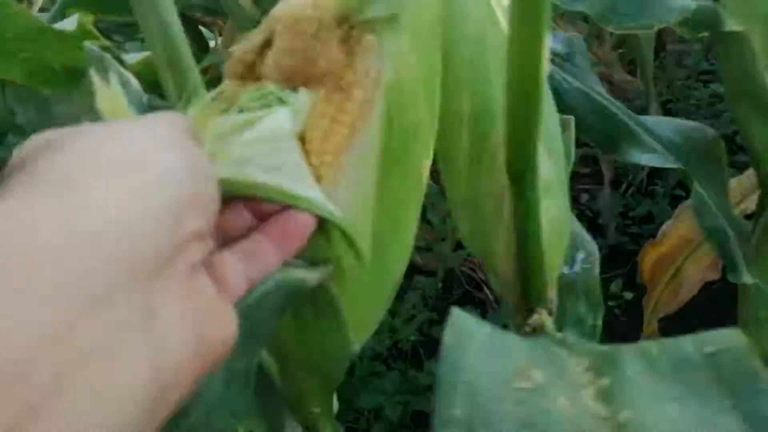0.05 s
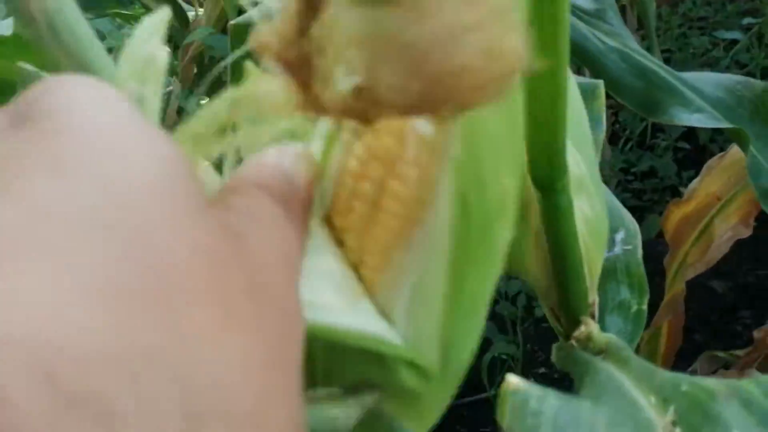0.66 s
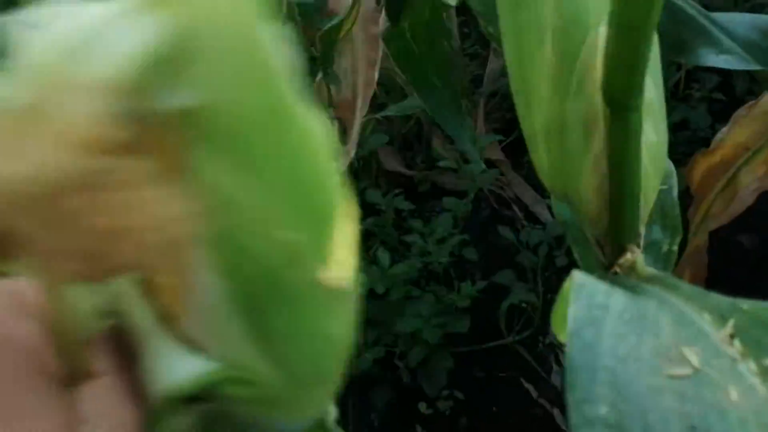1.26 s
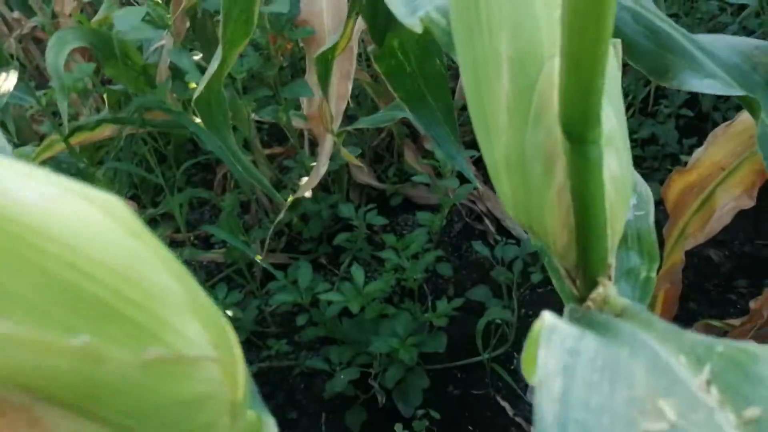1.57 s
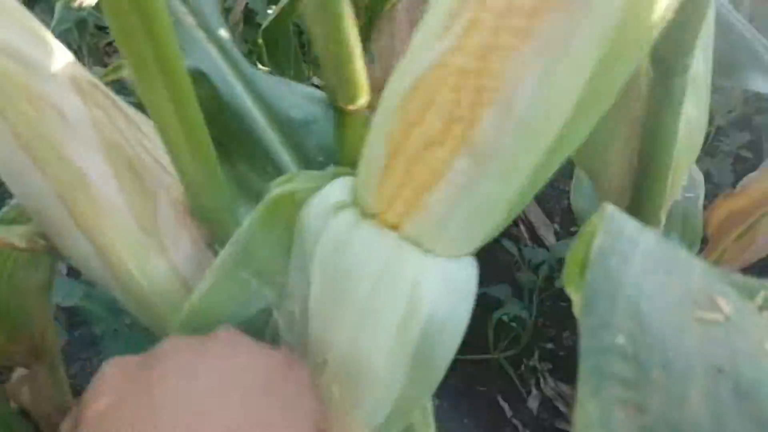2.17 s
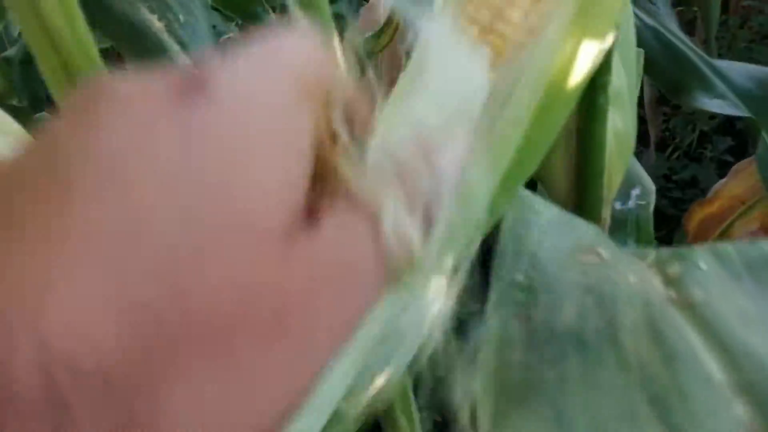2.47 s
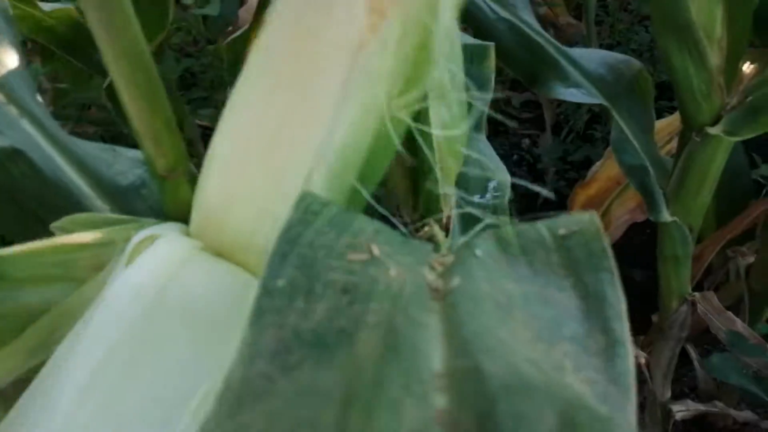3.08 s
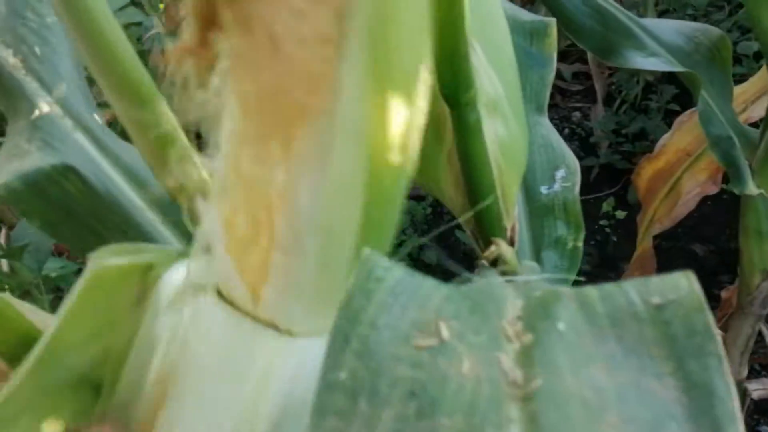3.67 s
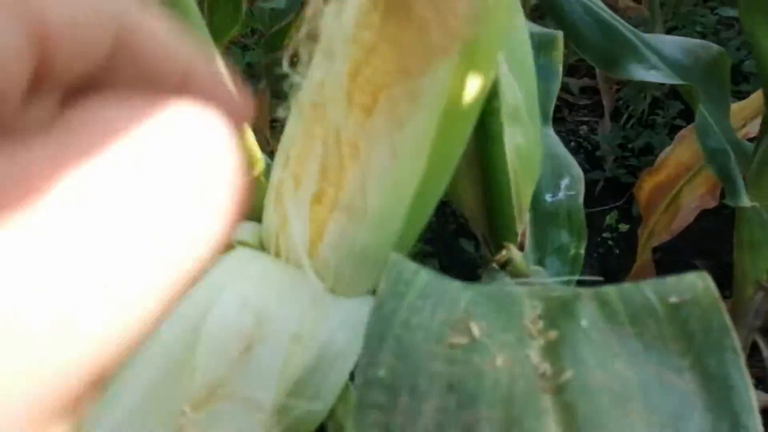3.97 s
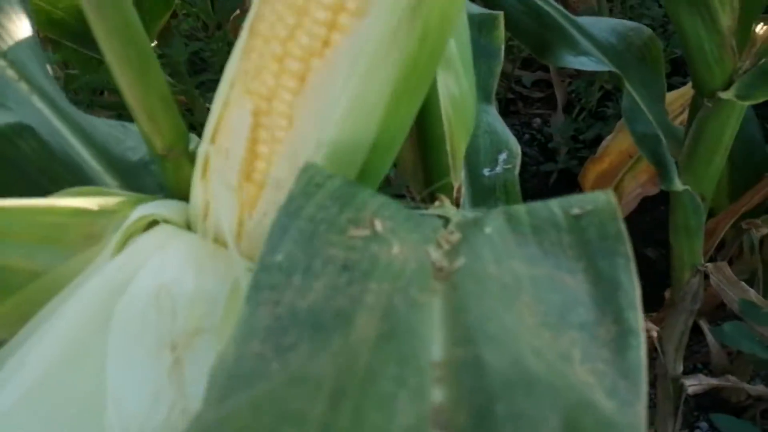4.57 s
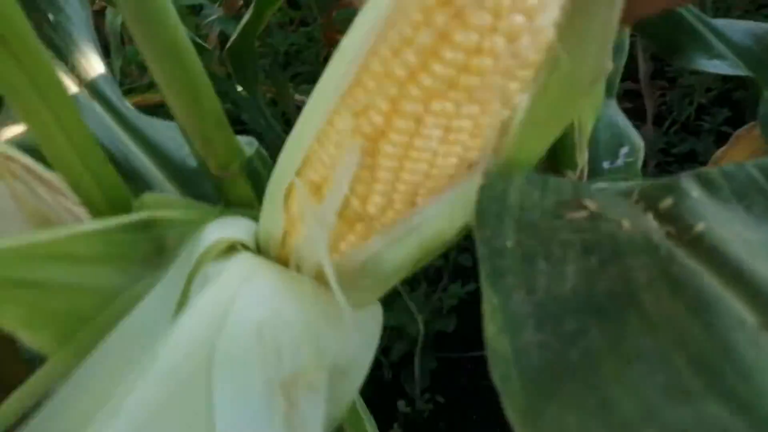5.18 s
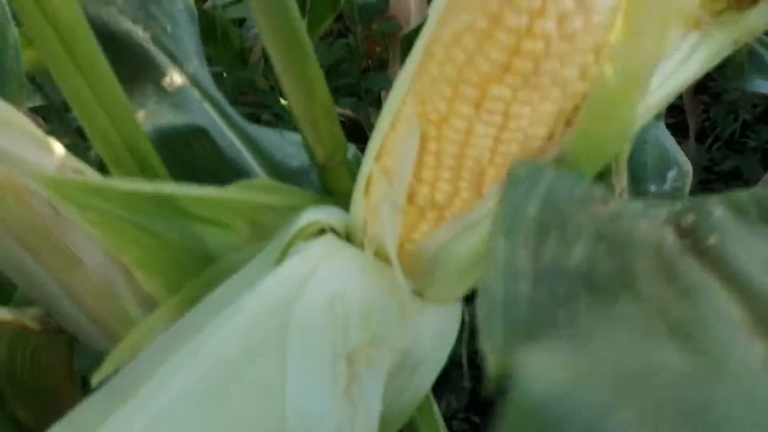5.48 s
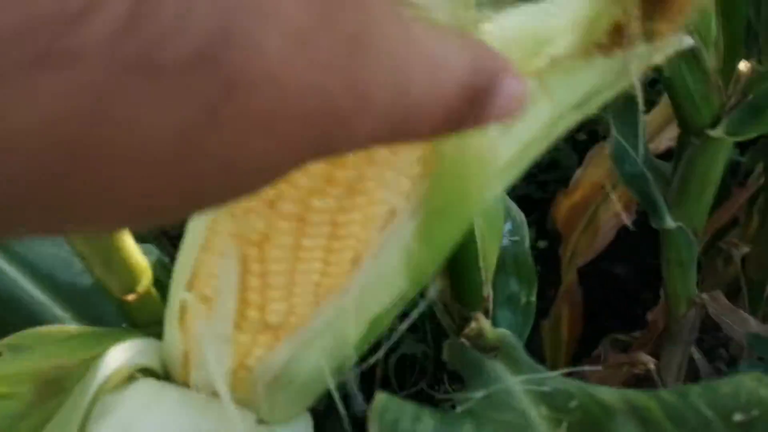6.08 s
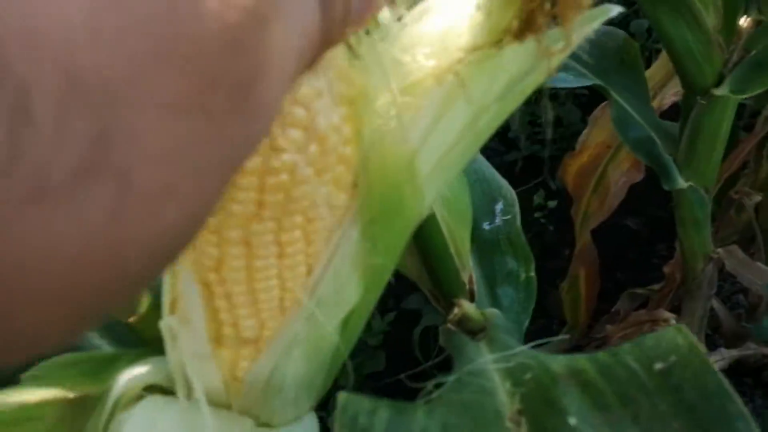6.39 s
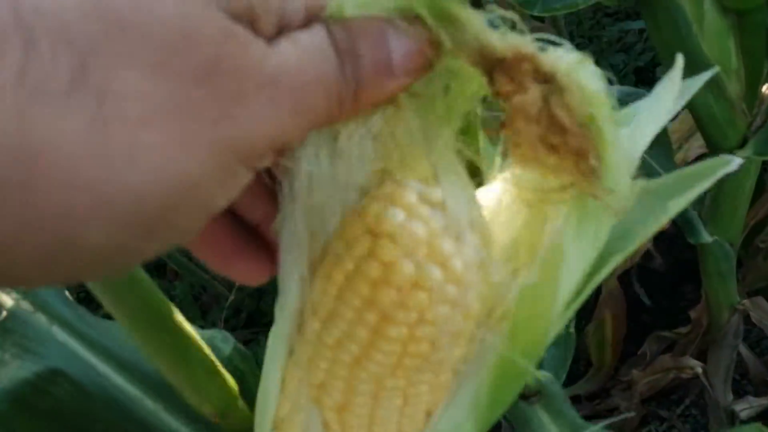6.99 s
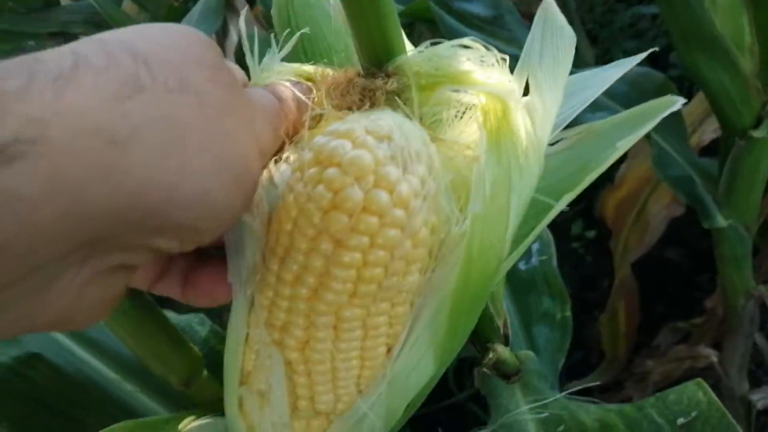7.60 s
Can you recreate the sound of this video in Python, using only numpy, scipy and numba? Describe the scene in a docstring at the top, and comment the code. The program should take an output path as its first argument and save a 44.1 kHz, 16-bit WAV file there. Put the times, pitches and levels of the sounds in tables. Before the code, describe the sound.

Close rustling, ripping and cracking of husk leaves pulled off an ear of corn, with a few dull knocks and a faint outdoor rumble.

```python
"""In a field, a hand peels the husk from an ear of corn, close to a two-port microphone.
It goes in short tugs: fibres tear in dense tiny snaps that ring the strip, and the leaves rub, slide
and squeak as they stick and slip. Strips rip free, ribs crack, silk draws out with a hiss and the cob
knocks against the stalk. Underneath are the hand's dull friction, a low hum like a far idling engine,
a faint flutter of air and one puff of wind."""
import sys
import numpy as np
from scipy import signal
from scipy.fft import rfft, irfft, next_fast_len
from scipy.io import wavfile
from scipy.ndimage import uniform_filter1d
from numba import njit

SR = 44100
rng = np.random.default_rng(int(sys.argv[2]) if len(sys.argv) > 2 else 0)


def dump(signal):
    """Clip the signal to [-1, 1] and save it as 16-bit WAV at the path in sys.argv[1]."""
    limited = np.clip(np.atleast_2d(signal).T, -1, 1)
    pcm = np.round(limited * 32767).astype(np.int16)
    wavfile.write(sys.argv[1], SR, pcm)


N = 346185
TIME = np.arange(N) / SR
PORT_LAG_S = .00041


# Tugs on the husk. Each row: start in seconds, length in seconds, tearing, rubbing and sliding
# levels in relative dB, swell from start to end in dB, ring of the strip in Hz.
TUGS = [(0.0, 0.037, -61, -47.5, -51.5, -5, 1910), (0.186, 0.11, -54.5, -48, -56.5, 0, 1920),
        (0.392, 0.18, -57.5, -55.5, -62, -6.5, 1850), (0.666, 0.14, -56, -56, -60.5, -3, 1750),
        (0.829, 0.2, -55, -55, -55.5, -5.5, 1910), (1.128, 0.075, -69, -60.5, -66, 4, 1970),
        (1.288, 0.1, -68, -54, -59, -6, 1500), (1.525, 0.095, -50, -49, -51, -5, 2050),
        (1.746, 0.17, -52, -63, -54.5, 0, 1870), (1.897, 0.1, -52.5, -52, -51, -2, 1680),
        (2.001, 0.08, -58, -55, -49, 0, 2100), (2.111, 0.32, -59, -55.5, -60, -7, 2020),
        (2.633, 0.12, -59, -65, -61, -1, 1980), (2.757, 0.23, -57, -51, -58, -1, 1900),
        (3.004, 0.23, -62, -54.5, -61, 0, 1900), (3.275, 0.12, -61, -58.5, -61.5, 1, 2100),
        (3.651, 0.21, -62, -57, -58, 1.5, 1890), (3.87, .1, -54, -51.5, -68, -5, 1730),
        (4.05, .2, -51.5, -54.5, -61.5, 1, 1830), (4.265, 0.17, -50.5, -52, -53, 0, 1950),
        (4.443, 0.21, -50.5, -56.5, -60.5, -2, 2090), (4.788, 0.12, -55, -54.5, -57, 5, 2180),
        (4.893, 0.039, -45.5, -58, -60, -2, 2240), (5.101, .03, -72, -70, -53.5, -3, 2300),
        (5.361, 0.13, -67, -56.5, -57.5, -1, 2200), (5.48, 0.057, -50, -63, -59.5, -4, 2160),
        (5.605, 0.017, -51, -68, -55.5, -2, 2090), (5.76, 0.09, -66, -72, -61.5, 2, 2020),
        (5.947, 0.045, -50, -54.5, -64.5, -2, 1820), (6.145, 0.14, -54, -52.5, -66.5, -7, 1780),
        (6.331, 0.14, -59.5, -56.5, -74, -5, 1770), (6.62, 0.12, -52, -60.5, -79, 1.5, 1910),
        (6.83, .18, -61.5, -64, -67, 0, 1880), (7.134, .17, -67, -63.5, -67.5, 0, 1930),
        (7.566, 0.093, -73, -63, -69, -5, 1980), (7.763, 0.071, -61.5, -70, -65, -3, 1900)]
# Leaves shifting in the hand between tugs. Each row: time in seconds, relative level in dB.
HANDLING = [(0, -57.5), (.55, -56), (.62, -63.5), (.75, -58), (1.25, -59.5), (1.7, -54.5), (2.45, -58),
            (3.5, -59.5), (3.85, -58.5), (4.04, -63), (4.7, -57), (5.04, -61), (5.3, -58), (5.85, -60.5),
            (6.08, -64.5), (7.1, -64.5), (7.4, -69), (7.85, -62.5)]

def pull(attack_s=.025, release_s=.035, handling_mix_db=(-5, .5, -2)):
    """Tearing, rubbing and sliding in dB: over the handling, each tug takes hold, then dies away."""
    power = from_db(in_time(HANDLING)[0] + np.array(handling_mix_db)[:, None]) ** 2
    for s, length, *levels_db, swell_db, _ in TUGS:
        age = TIME - s
        attack = np.clip(age / attack_s + .5, 0, 1)
        hold = from_db(swell_db * (np.clip(age / length, 0, 1) - .5))
        release = np.exp(-np.clip(age - length, 0, 1) / release_s)
        power += (from_db(levels_db)[:, None] * attack * hold * release) ** 2
    return 10 * np.log10(power)


def tearing(fibres, level_db, rise_hz_per_s=680):
    """Snapping fibres ring the strip; each strip has its own pitch, which climbs as it tightens."""
    glide = [(s + share * length, hz + rise_hz_per_s * length * (share - .5))
             for s, length, *_, hz in TUGS for share in (0, 1)]
    strip_hz = in_time(glide)[0] * np.exp(.048 * drift(35))
    strip = resonate(port_noise(alike=.47) * fibres, strip_hz, width_hz=604)
    return from_db(level_db) * at_ports(strip, [(900, 10.5), (1500, 3.5), (2400, -3), (4000, 15.5)])


# The papery rasp of leaf on leaf. Each row: frequency in Hz, gain in dB.
RUB_EQ = [(500, -26), (1500, -22), (2100, -4), (2700, -1), (5500, -1.5), (7500, -11.5), (10000, -20),
          (16000, -7)]

def rubbing(fibres, level_db):
    """Leaf drags on leaf; the contact patch wanders, and its two rings with it."""
    friction = port_noise(alike=.15) * fibres
    patch = resonate(port_noise(alike=.2) * fibres, 2850 * np.exp(.18 * drift(40)), width_hz=410)
    edge = resonate(friction, 5200 * np.exp(.14 * drift(30)), width_hz=770) * from_db(3.5 * drift(22))
    rings = from_db(-3) * at_ports(patch, RUB_EQ) + from_db(-12) * at_ports(edge, RUB_EQ)
    return from_db(level_db + 1.5) * rms_one(at_ports(friction, RUB_EQ) + rings)


# The bright hiss of parting leaves. Each row: frequency in Hz, gain in dB.
SLIDE_EQ = [(500, -28), (1500, -9), (3000, -8.5), (5000, -2.5), (8000, -2), (16000, 0.5)]
# Where the leaves slide. Each row: time in seconds, pan position (-10 is centre, higher is left).
SLIDE_PAN = [(0, -10.5), (.8, -11.5), (1.0, -21), (1.35, -13.5), (3.3, -12.5), (4.95, -14), (5.2, -9),
             (5.8, -11.5), (7.85, -11)]

def sliding(fibres, hairs, level_db):
    """Coarse and fine hairs catch in turn, so the hiss keeps changing its brightness."""
    coarse = port_noise(alike=.087) * hairs * fibres ** .5
    coarse = at_ports(coarse, SLIDE_EQ, [(9500, -2), (12000, -3)])
    fine = at_ports(port_noise(alike=.1) * hairs, [(6000, -36), (10000, -5), (12000, 3.5)])
    fine *= from_db(4.1 * drift(25) - 13.5)
    return from_db(level_db + 4.5) * (coarse + fine) * pan(1.1 * (in_time(SLIDE_PAN)[0] + 10))


# Fast rips. Each row: start in seconds, length in seconds, level in dB, body at 1.7 kHz in dB,
# treble at 9 kHz in dB, left over right in dB.
RIPS = [(0.224, 0.086, -44.5, -17, 1, 3), (0.75, 0.05, -50.5, -8, -13, 4), (0.823, 0.027, -50.5, -3, 1, 3),
        (1.404, 0.079, -43, -7, 6, -4), (1.545, 0.033, -41, -14, 4, -4),
        (1.975, 0.037, -39.5, -4.5, -6, -4), (2.757, 0.12, -45.5, -19, -10, 8),
        (3.942, 0.033, -46.5, -9, -9, 3), (4.905, 0.053, -46, -13, 6.5, -15.5),
        (6.183, 0.0083, -48, -17, -23, 0)]

def rips():
    """A strip lets go all at once: a quick run of strong snaps."""
    out = np.zeros((2, N))
    grain = snaps(per_s=900, spread_db=1.8, decay_s=.0013, smooth=.5)
    run = port_noise(alike=.079) * grain
    for s, length, level_db, body_db, treble_db, balance_db in RIPS:
        span, swell = stroke(s, length)
        tone = [(300, body_db - 15), (1700, body_db), (2800, 0),
                (5400, 3 + treble_db / 2), (9000, treble_db)]
        out[:, span] += from_db(level_db) * swell * at_ports(run[:, span], tone) * pan(balance_db)
    return out


# Leaf ribs cracking. Each row: start in seconds, then level, body and treble in relative dB.
CRACKS = [(.0024, -20.5, -28, -21), (0.026, -28, -29, -7), (.0638, -33.5, -21, -10), (0.124, -39, -24, -27),
          (.521, -41, -4, -18), (.65, -38.5, 2, -16), (.8254, -40, -26, -22), (1.259, -42, -26, 1),
          (1.368, -36.5, -20, -12), (1.416, -33, -32, -10), (1.54, -30, -18, -8), (1.766, -26, -13, -9.5),
          (1.7972, -35, -18, -8), (1.9062, -27, -22, -13), (1.9205, -31.5, -25, -9),
          (3.286, -37.5, -19, -7), (3.9901, -31.5, 5.5, -2), (4.1205, -41, -13, 14),
          (4.419, -33.5, -16, -23), (4.6402, -36.5, -25, -27), (4.7561, -38, -4, -1), (5.13, -35, -20, 5),
          (5.194, -37.5, -22, -7), (5.228, -40.5, -29, -10), (5.4868, -38, -29, -14),
          (5.6324, -30.5, -16.5, -17), (5.725, -41, -20, -12), (5.913, -38, -15, -12),
          (5.9199, -31, -19.5, -11.5), (6.2642, -49, -8, -5), (7.6306, -45, -24, -2)]

def cracks(yield_s=.0009, break_s=.002, decay_s=.0022, tail_s=.011, tail_db=-20):
    """A rib yields, then breaks in a flurry of a few milliseconds; the leaf shivers briefly after it."""
    out = np.zeros((2, N))
    flurry = port_noise(alike=.54) * snaps(per_s=1800, spread_db=14, decay_s=.00046, smooth=.88)
    for s, level_db, body_db, treble_db in CRACKS:
        span = slice(max(int((s - .01) * SR), 0), int((s + .05) * SR))
        age = TIME[span] - s - break_s
        after = np.maximum(age, 0)
        attack = np.exp(np.minimum(age, 0) / yield_s)
        burst = attack * (np.exp(-after / decay_s) + from_db(tail_db) * np.exp(-after / tail_s))
        tone = [(300, body_db - 1), (1100, body_db + 10), (1900, body_db + 16.5),
                (3000, .63), (5500, -1.3), (9000, treble_db + 11.5)]
        crack = at_ports(flurry[:, span] * burst, tone)
        out[:, span] += from_db(level_db - 3) * crack * np.sqrt(np.mean(burst ** 2))
    return out


# Damp leaf squeaking on leaf. Each row: start in seconds, length in seconds, relative level in dB,
# then opening pitch, closing pitch and resonance width in Hz.
SQUEAKS = [(0.303, 0.024, -56, 2550, 2380, 350), (0.733, .03, -50, 5000, 5100, 1000),
           (0.82, .022, -47.5, 5050, 5200, 1000), (1.358, 0.084, -54.5, 1120, 1260, 600),
           (1.496, 0.07, -54.5, 1210, 1100, 800), (1.618, 0.068, -49.5, 3250, 3220, 350),
           (1.832, .06, -51, 1920, 1740, 400), (1.899, 0.043, -39, 1710, 1570, 700),
           (2.098, 0.05, -49, 2470, 2100, 400), (2.758, 0.014, -41.5, 2600, 2680, 500),
           (2.782, 0.068, -43, 2970, 2870, 700), (3.14, 0.022, -50.5, 3630, 3500, 250),
           (3.28, 0.014, -50.5, 3620, 3600, 300), (3.367, .025, -54, 2170, 2120, 300),
           (3.932, 0.043, -41.5, 2770, 2700, 645), (4.53, 0.047, -54, 4700, 5370, 600),
           (4.609, 0.0092, -40, 2060, 2120, 300), (4.915, 0.022, -45.5, 3320, 3300, 600),
           (5.555, 0.019, -51.5, 1830, 1820, 250), (6.358, 0.028, -51, 1850, 1780, 350),
           (6.393, 0.09, -54, 1770, 1630, 350), (6.731, 0.023, -51.5, 2650, 2700, 1790),
           (7.284, 0.041, -55, 1740, 1690, 450), (7.786, .022, -55, 2780, 2780, 300)]

def squeaks():
    """Stick and slip: quick uneven slips drive one narrow resonance of the taut leaf."""
    out = np.zeros((2, N))
    slips = port_noise(alike=.47) * snaps(per_s=560, spread_db=-7.5, decay_s=.002, smooth=.19)
    for s, length, level_db, start_hz, end_hz, width_hz in SQUEAKS:
        span, swell = stroke(s, length, rise_s=.0064, fall_s=.011)
        glide_hz = np.interp(TIME[span], [s, s + length], [start_hz, end_hz])
        ring = resonate(slips[:, span], glide_hz, width_hz)
        out[:, span] += from_db(level_db - 4.5) * rms_one(ring * swell) * np.sqrt(np.mean(swell ** 2))
    return out * pan(17)


# Dull knocks of the cob. Each row: start in seconds, level in dB, pitch in Hz.
KNOCKS = [(.028, -38, 634), (.080, -37.5, 596), (.124, -34.5, 690), (.44, -45.5, 362), (.52, -48, 620),
          (.649, -36, 487), (0.884, -42, 259), (1.524, -41, 397), (2.64, -45, 474), (3.991, -46, 1100),
          (5.104, -38, 290), (5.2, -37, 457), (5.214, -37.5, 450), (5.228, -41, 620), (5.634, -34.5, 830),
          (5.642, -41.5, 398)]

def knocks(ring_s=.0036, scuff_s=.007, scuff_db=-8):
    """The cob bumps the stalk: a few damped cycles and the scuff of the contact."""
    out, age = np.zeros((2, N)), TIME[:SR // 16]
    for s, level_db, hz in KNOCKS:
        ring = np.sin(2 * np.pi * hz * age) * np.exp(-age / ring_s)
        tone = [(hz / 4, -14), (hz / 2, -2), (hz * 1.1, 0), (hz * 3, -16), (hz * 12, -40)]
        scuff = rms_one(colour(port_noise(alike=.56, size=len(age)), tone)) * np.exp(-age / scuff_s)
        start = int(s * SR)
        out[:, start:start + len(age)] += from_db(level_db) * (lag_left(ring) + from_db(scuff_db) * scuff)
    return out


# The crisp tick of one fibre. Each row: frequency in Hz, gain in dB.
POP_EQ = [(500, -6.5), (1700, -3), (3000, -1), (6000, -1), (10000, 1), (16000, 12)]

def pops(slide_db, per_s=60, spread_db=4.5, decay_s=.00073, relative_db=-6.5):
    """Single stiff fibres tick out of the rustle at random, louder as the leaves slide harder."""
    sizes = from_db(spread_db * np.minimum(rng.exponential(1, N), 3))
    born = rng.random(N) < per_s / SR
    ticks = signal.lfilter([1], [1, -np.exp(-1 / (decay_s * SR))], sizes * born + 1e-18)
    return from_db(slide_db + relative_db) * at_ports(port_noise(alike=.32) * ticks, POP_EQ)


def silk(start_s=4.132, length_s=.069, level_db=-47):
    """Fine threads draw out from under the husk with a thin, very bright hiss."""
    out = np.zeros((2, N))
    span, swell = stroke(start_s, length_s, rise_s=.006, fall_s=.12)
    threads = port_noise(alike=.16, size=len(swell)) * from_db(2 * drift(400)[span])
    tone = [(3000, -37), (8000, -11), (10500, -8), (12500, -5), (14000, -3), (15500, -20)]
    out[:, span] = from_db(level_db) * swell * at_ports(threads, tone)
    return out * pan(1.7)


# The fader ride of the grip. Each row: time in seconds, relative level in dB.
GRIP_LEVEL = [(0, -64.5), (1.0, -63), (2.5, -65), (5.05, -65.5), (5.25, -60), (5.55, -60), (5.85, -65),
              (7.85, -65.5)]
# The muffled scrub of the hand. Each row: frequency in Hz, gain in dB.
HAND_EQ = [(100, 3.5), (280, -5), (600, 1), (900, -0.5), (1300, -5), (2500, -42), (8000, -45)]

def hand_friction():
    """The hand drags on the cob, strongest as it shifts its grip."""
    scrub = port_noise(alike=.66) * snaps(per_s=150, spread_db=2, decay_s=.0064, smooth=.53)
    return from_db(in_time(GRIP_LEVEL)[0] + 4.5) * rms_one(colour(scrub, HAND_EQ)) * pan(.98)


def wind_puff(at_s=.886, width_s=.0091, swing_hz=42, level_db=-27):
    """One eddy pushes and pulls at the ports."""
    age = TIME - at_s
    swell = np.exp(-(age / width_s) ** 2)
    return -from_db(level_db) * swell * np.sin(2 * np.pi * swing_hz * age) * pan(7.5)


# The tones of the far hum. Each row: frequency in Hz, relative level in dB.
HUM_TONES = [(33, 1), (38, -15), (54.6, -0.5), (66.2, 5.5), (99.6, -1.5), (109.2, 3), (136.5, -8.5),
             (164, -4)]
# The low bed around them. Each row: frequency in Hz, gain in dB.
RUMBLE_EQ = [(12, 1), (28, -4.5), (70, -1.5), (130, 0.5), (190, -6.5), (260, -11), (400, -25), (1000, -64)]
# One fader ride for hum, rumble and air. Each row: time in seconds, relative level in dB.
BED_LEVEL = [(0, -66.5), (.24, -55), (.79, -56), (1.0, -53.5), (1.3, -60.5), (1.92, -65), (2.45, -57.5),
             (3.6, -59), (4.15, -60.5), (4.65, -57), (4.96, -68), (5.12, -55), (5.45, -55), (5.9, -57),
             (7.85, -56.5)]

def far_hum():
    """Low tones waver in level and pitch inside a rumble, like a far idling engine."""
    tones = np.zeros(N)
    for hz, db in HUM_TONES:
        gain = from_db(db + 1.7 * drift(3))
        wavering_hz = hz + .39 * drift(1.932)
        tones += gain * np.sin(2 * np.pi * np.cumsum(wavering_hz) / SR)
    hum = from_db(3) * rms_one(tones) * pan(5.8)
    rumble = rms_one(colour(port_noise(alike=.96), RUMBLE_EQ)) * pan(2.2)
    return from_db(in_time(BED_LEVEL)[0]) * (hum + rumble)


def air_flutter():
    """Air stirs on each port separately: a faint, deep flutter."""
    flutter = colour(port_noise(alike=0), [(10, 7), (30, -17), (80, -3), (250, -23.5), (1000, -42)])
    return from_db(in_time(BED_LEVEL)[0] - 10.5) * rms_one(flutter) * pan(6.5)


# The tone of each microphone port. Each row: frequency in Hz, gain in dB.
LEFT_PORT_EQ = [(300, -13), (1000, 4), (1700, 2.5), (2500, 0.5), (3250, -0.5), (3800, -7.5), (4400, -9),
                (5300, -6), (6500, -7.5), (8000, -13), (10000, -15), (11000, -21.5), (14000, -22),
                (15000, -36.5)]
RIGHT_PORT_EQ = [(300, 4.5), (1000, -5.5), (1500, -8.5), (3100, -9.5), (3900, -15), (5300, -11),
                 (6200, -12.5), (7800, -12), (9300, -5), (10000, -3.5), (11000, -11.5), (14000, -20.5),
                 (15000, -18.5)]

def at_ports(x, *curves):
    """Husk sound through its EQ curves and the two resonant ports, at an rms of 1."""
    left = colour(x[0], LEFT_PORT_EQ, *curves)
    right = colour(x[1], RIGHT_PORT_EQ, *curves)
    return rms_one(np.array([left, right]))


def lag_left(x):
    """One sound at both ports, reaching the left one later."""
    return np.array([np.roll(x, round(PORT_LAG_S * SR)), x])


def port_noise(alike, size=N):
    """White noise at two ports, which share the fraction `alike` of its power."""
    shared, *own = rng.standard_normal((3, size))
    return np.sqrt(alike) * lag_left(shared) + np.sqrt(1 - alike) * np.array(own)


def snaps(per_s, spread_db, decay_s, smooth):
    """Envelope of fibres giving way at random, each dying fast, over a share of smooth friction."""
    sizes = from_db(spread_db * np.minimum(rng.exponential(1, N), 4))
    # neighbouring fibres go together, so snaps come in clusters
    born = rng.random(N) < per_s * from_db(2.2 * drift(70)) / SR
    energy = signal.lfilter([1], [1, -np.exp(-2 / (decay_s * SR))], sizes ** 2 * born + 1e-18)
    energy = uniform_filter1d(energy, size=SR // 1500)
    # the hand pulls evenly, so snaps share out a steady energy
    energy = energy / (uniform_filter1d(energy, size=SR // 10) + 1e-9)
    return np.sqrt(smooth + (1 - smooth) * np.abs(energy))


def stroke(s, length, rise_s=.0017, fall_s=.005):
    """The samples of a short stroke, and its swell and fade over them."""
    span = slice(int((s - .02) * SR), int((s + length + .06) * SR))
    corners_s = [s - rise_s, s + rise_s, s + max(length * .54, rise_s), s + length + fall_s]
    return span, np.interp(TIME[span], corners_s, [0, 1, 1, 0])


def resonate(x, hz, width_hz):
    """Two gliding resonances in a row: a narrow band with steep sides."""
    step = 2 * np.sin(np.pi * hz / SR)
    damping = float(np.clip(width_hz / np.mean(hz), .01, 1))
    return moving_resonance(moving_resonance(np.ascontiguousarray(x), step, damping), step, damping)


@njit
def moving_resonance(x, step, damping):
    """A two-pole band-pass whose centre glides."""
    out = np.zeros_like(x)
    for ch in range(2):
        low = band = 0.
        for i in range(x.shape[1]):
            low += step[i] * band
            band += step[i] * (x[ch, i] - low - damping * band)
            out[ch, i] = band
    return out


def colour(x, *curves):
    """Pass a sound through EQ curves of (Hz, dB) points, one after the other."""
    size = next_fast_len(x.shape[-1])
    log_hz = np.log(np.maximum(np.arange(size // 2 + 1) * SR / size, 1))
    db = sum(np.interp(log_hz, np.log(hz), gain_db) for hz, gain_db in map(np.transpose, curves))
    return irfft(rfft(x, size) * from_db(db), size)[..., :x.shape[-1]]


def drift(rate):
    """A random wander with an rms of 1, turning `rate` times a second."""
    knots = rng.standard_normal(4000)
    return rms_one(np.interp(TIME * rate, np.arange(len(knots)), knots))


def in_time(rows):
    """Each column of an automation curve at every sample."""
    s, *columns = np.transpose(rows)
    return [np.interp(TIME, s, c) for c in columns]


def pan(balance_db):
    """Left and right gains for a level difference; positive leans left."""
    return from_db(np.array([[.5], [-.5]]) * balance_db)


def from_db(db):
    """Decibels to gain."""
    return 10 ** (np.asarray(db) / 20)


def rms_one(x):
    """Scale to an rms of 1."""
    return x / np.sqrt(np.mean(x ** 2) + 1e-20)


def scene():
    """The husk in front of the quiet field; one grain of snapping fibres runs through the peeling."""
    tear_db, rub_db, slide_db = pull()
    fibres = snaps(per_s=520, spread_db=4.5, decay_s=.0064, smooth=.53)
    hairs = snaps(per_s=900, spread_db=3, decay_s=.0017, smooth=.58)
    peeling = tearing(fibres, tear_db) + rubbing(fibres, rub_db) + sliding(fibres, hairs, slide_db)
    accents = rips() + squeaks() + silk() + cracks() + knocks()
    background = far_hum() + air_flutter() + hand_friction() + wind_puff()
    return peeling + accents + pops(slide_db) + background


def record(dry, cutoff_hz=15600):
    """A steep low-pass takes off the very top."""
    return signal.sosfilt(signal.ellip(10, .2, 70, cutoff_hz, fs=SR, output="sos"), dry)


dry = scene()
out = record(dry)
dump(out)
```